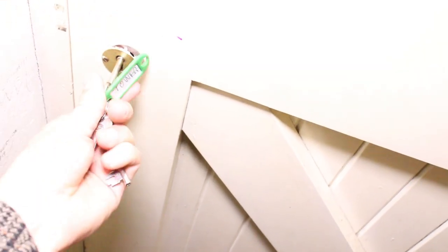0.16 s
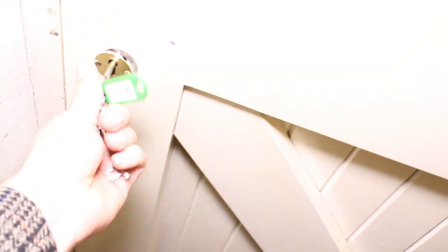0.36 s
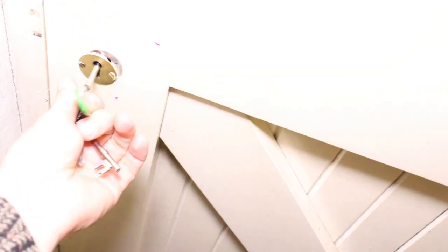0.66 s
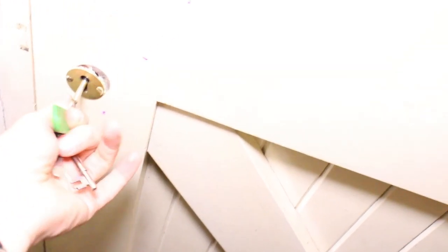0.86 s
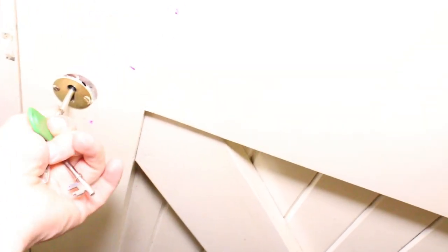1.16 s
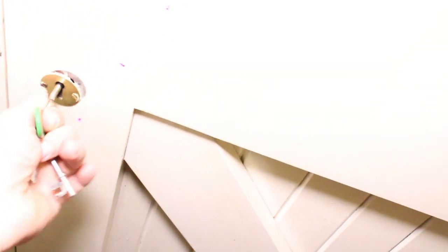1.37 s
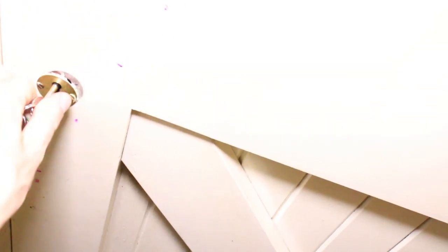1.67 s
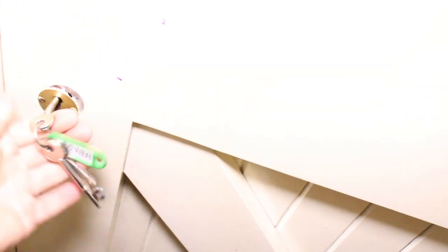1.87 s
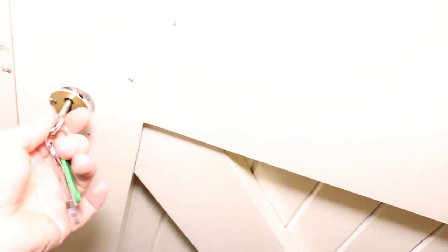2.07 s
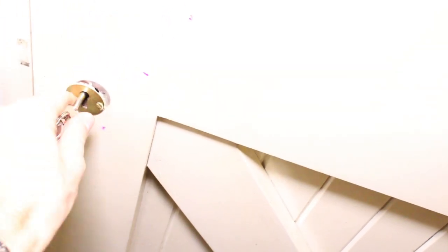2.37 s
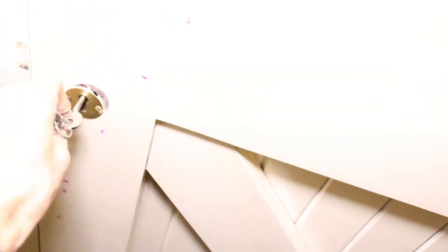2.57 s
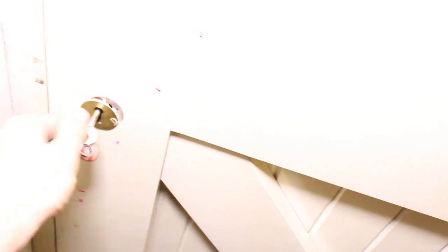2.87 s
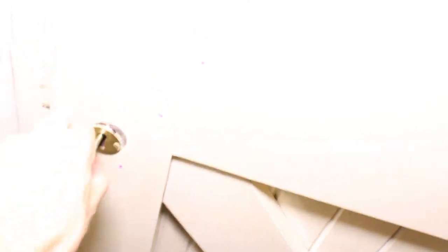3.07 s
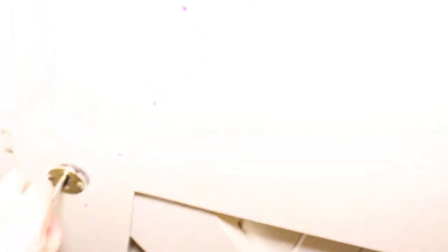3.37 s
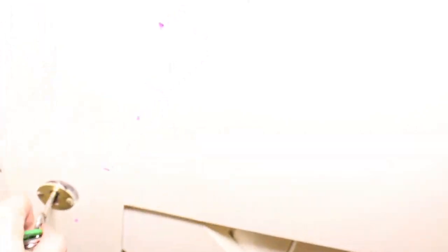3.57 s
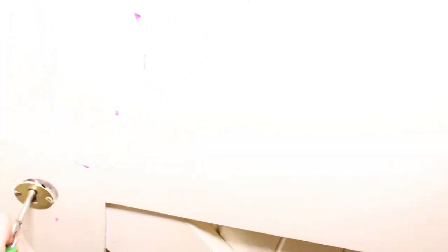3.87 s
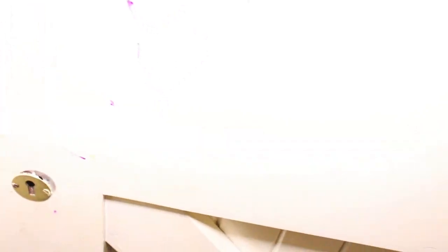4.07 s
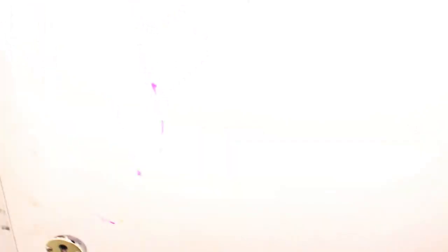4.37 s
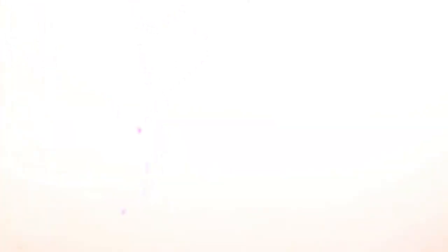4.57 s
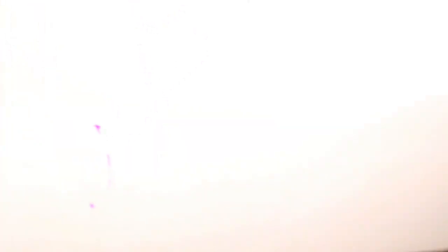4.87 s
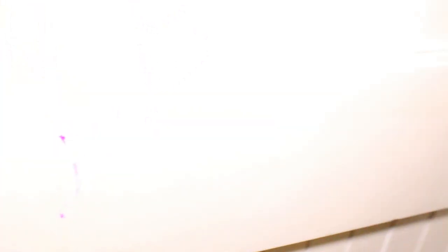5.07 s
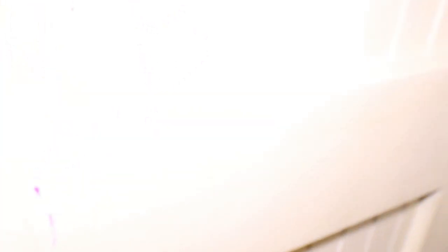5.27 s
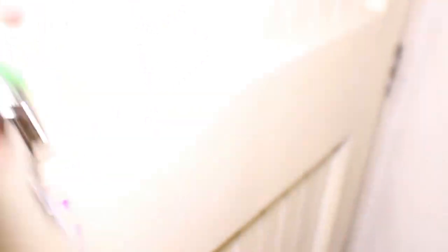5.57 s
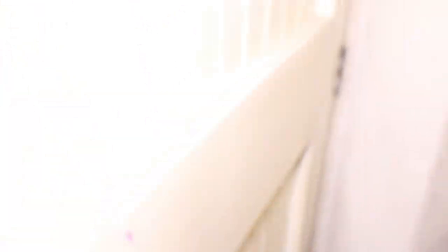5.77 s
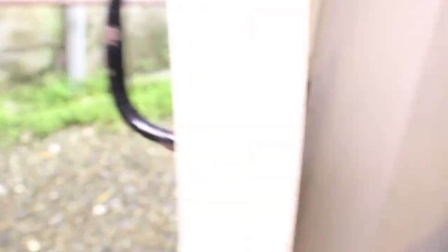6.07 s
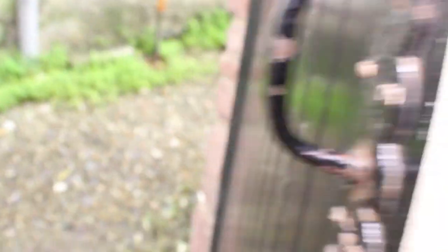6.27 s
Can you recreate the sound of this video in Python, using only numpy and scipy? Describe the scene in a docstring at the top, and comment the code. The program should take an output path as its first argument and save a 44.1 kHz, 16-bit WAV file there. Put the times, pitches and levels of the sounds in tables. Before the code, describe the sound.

Keys jangle and a lock clicks close by, a wooden door thudding in its frame before the steel latch clanks loudly.

```python
"""Keys work the lock of a wooden door, close to a small microphone in a bare hallway.
Over hush, rumble and a brief hum, keys chink and levers click. From 0.46 s the door thuds in its frame;
thin squeaks, handling bumps and the rasp of sliding metal follow. The steel latch rings faintly at 2.6 s
and clanks loudest near 4.8 s. From 5.4 s the door swings with a faint hiss."""
import sys
import numpy as np
from scipy import signal
from scipy.fft import rfft, irfft
from scipy.io import wavfile
from scipy.ndimage import uniform_filter1d

SR = 44100
rng = np.random.default_rng(int(sys.argv[2]) if len(sys.argv) > 2 else 0)


def to_wav(s):
    """Save 16-bit WAV."""
    ch = np.atleast_2d(s).T  # columns
    pcm = np.round(np.clip(ch, -1, 1) * 32767)  # PCM
    wavfile.write(sys.argv[1], SR, pcm.astype(np.int16))


N = 283563


def undb(db):
    return 10 ** (np.asarray(db) / 20)


def unit_rms(x):
    return x / np.sqrt(np.mean(x ** 2))


def coloured(spectrum):
    """Noise of rms 1 shaped by (Hz, dB) points."""
    hz, db = np.transpose(spectrum)
    bin_hz = np.maximum(np.fft.rfftfreq(N, 1 / SR), 1)
    gain = undb(np.interp(np.log(bin_hz), np.log(hz), db))
    return unit_rms(irfft(rfft(rng.standard_normal(N)) * gain, N))


def band(lo_hz, hi_hz):
    """Band noise of rms 1."""
    sos = signal.butter(3, [lo_hz, hi_hz], "bandpass", fs=SR, output="sos")
    return unit_rms(signal.sosfilt(sos, rng.standard_normal(N)))


def level_curve(points):
    """Linear gain along (s, .., dB) points; soft ends, silent outside."""
    points = np.array(points)
    db = np.interp(np.arange(N) / SR, points[:, 0], points[:, -1], left=-200, right=-200)
    return uniform_filter1d(undb(db), size=400)


def grit(per_s, spread_db, smear_s):
    """Envelope of rms 1: tiny impacts of uneven size."""
    size_db = spread_db * np.minimum(rng.exponential(size=N), 2)
    hits = undb(size_db) * (rng.random(N) < per_s / SR)
    return unit_rms(signal.lfilter([1], [1, -np.exp(-1 / (smear_s * SR))], hits))


def bursts(start_s, db, t60_s, rise_share):
    """Envelope: each burst swells over a share of its length, then decays."""
    env = np.zeros(N)
    for start, gain, length_s in zip((start_s * SR).astype(int), undb(db), np.clip(t60_s, .004, .6)):
        age = np.arange(min(int(length_s * SR), N - start)) / SR / length_s
        attack = (1 - np.exp(-age / rise_share)) ** 2
        env[start:start + len(age)] += gain * attack * np.exp(-np.log(1000) * age)
    return env


def ring(parts, blows, scatter_db, detune, rise_s, slow_share, flutter):
    """Blows (s, dB per part) excite modes with a fast and a slow decay; loose contact adds flutter."""
    hz, mode_db, t60_s = np.concatenate(parts).T[:, :, None]
    part_of_mode = np.repeat(np.arange(len(parts)), [len(p) for p in parts])
    out = np.zeros(N)
    for start_s, *part_db in blows:
        level_draw, pitch_draw, phase = rng.standard_normal((3, len(hz), 1))
        gain = undb(np.array(part_db)[part_of_mode, None] + mode_db + scatter_db * level_draw)
        start = int(start_s * SR)
        t = np.arange(min(int(t60_s.max() * SR), N - start)) / SR
        decay = np.exp(-np.log(1000) * t / t60_s)
        env = (1 - np.exp(-t / rise_s)) ** 2 * (slow_share * decay + (1 - slow_share) * decay ** 4)
        wave = np.sin(2 * np.pi * hz * t * (1 + detune * pitch_draw) + phase)
        out[start:start + len(t)] += (gain * env * wave).sum(axis=0)
    return out * (1 + flutter * band(hz.mean() / 300, hz.mean() / 50))


def hush(level_db=-80):
    """Steady noise floor, strongest near 130 Hz."""
    # Noise spectrum. Each row: frequency in Hz, relative density in dB.
    spectrum = [(76, -25.5), (130, 0), (282, -27), (437, -21), (588, -24.5), (825, -31), (1590, -35.5),
                (9310, -46), (15000, -59.5)]
    return undb(level_db) * coloured(spectrum)


def rumble():
    """Low noise that swells and sinks."""
    # Rumble spectrum. Each row: frequency in Hz, relative density in dB.
    spectrum = [(12, -47), (20, -13), (38, -1), (97, -8.5), (124, -14), (155, -19), (184, -28),
                (250, -31.5), (320, -53), (550, -120)]
    # Swells. Each row: time in seconds, level in dB.
    levels = [(0.0, -66.5), (1.14, -65), (1.31, -49.5), (2.2, -74), (3.81, -61.5), (5.64, -71),
              (5.87, -56.5), (6.43, -69)]
    return coloured(spectrum) * level_curve(levels)


def hum(hz=96):
    """Low tone, ending at the first door thud."""
    # Hum envelope. Each row: time in seconds, level in dB.
    levels = [(0.0, -58), (0.376, -68), (0.46, -59)]
    return np.sqrt(2) * level_curve(levels) * np.sin(2 * np.pi * hz * np.arange(N) / SR)


def keys(neighbour_db=-9.5, top_key_db=12):
    """Thin keys strike each other and ring high; a loose rattle in the hand stirs the same modes."""
    # Modes, one list per key. Each row: frequency in Hz, level in dB, t60 in seconds.
    modes = [
        [(7740, -4, 0.14), (8480, -3.5, 0.14), (8800, -7.5, 0.069)],
        [(9290, -6.5, 0.27), (9350, -8, 0.15), (10170, -12, 0.16)],
        [(13900, -4.5, 0.2)],
        [(15810, -13, 0.36), (15100, -13, 0.18)],
    ]
    # Key on key. Each row: start in seconds, level in dB, place from 0 (lowest key) to 3 (highest).
    chinks = [(.0727, -59, 0.11), (.0857, -53.5, 1.35), (.2004, -52, 0.16), (.3571, -48.5, 0.58),
              (.5876, -68, 0.048), (.7522, -61, 0.086), (1.6851, -52, 1.06), (1.7214, -53, 1.5),
              (1.8143, -38.5, 1.3), (1.9174, -55, 1.1), (1.9644, -57, 1.1), (2.0018, -49, 1.5),
              (2.0443, -56.5, 0.9), (2.0744, -60, .6), (2.1535, -41.5, 1), (2.238, -50, 0.11),
              (2.2732, -56.5, 1.1), (2.7714, -45, 0.82), (2.7894, -56, .9), (2.82, -44, 0.97),
              (3.5814, -71, .1), (3.6701, -57, .1), (4.0494, -62, 2.4), (4.2268, -63, 2.9),
              (4.3051, -51.5, 1.1), (4.3186, -53, 0.99), (4.4179, -57.5, 2)]
    # Rattling, one list per spell. Each row: time in seconds, level in dB.
    jangles = [
        [(0.0, -67), (0.032, -74), (0.35, -113)],
        [(1.65, -79), (1.988, -65.5), (2.4, -101)],
        [(2.72, -108), (2.776, -62), (2.9, -101)],
        [(4.28, -75.5), (4.36, -78.5), (4.46, -77)],
    ]
    ticks = band(4350, 15600) * grit(per_s=96, spread_db=3.1, smear_s=0.0075)
    shimmer = sum(undb(db) * unit_rms(signal.lfilter(*signal.iirpeak(hz, Q=90, fs=SR), ticks))
                  for hz, db, _ in np.concatenate(modes))
    rattle = unit_rms(ticks + 0.75 * shimmer) * sum(level_curve(spell) for spell in jangles)
    start_s, chink_db, place = np.transpose(chinks)
    key = np.arange(len(modes))[:, None]
    # Weaker with each key away from the blow; the highest answers more readily.
    key_db = chink_db + neighbour_db * np.abs(key - place) + top_key_db * (key == key.max())
    return rattle + ring(modes, np.column_stack([start_s, *key_db]),
                         scatter_db=3.8, detune=0.001, rise_s=0.00098, slow_share=0.048, flutter=0.7)


def lock(contact_db=-6.5, edge_db=-2.5, glint_db=-6, wood_db=-3, falloff_db_per_octave=-26):
    """Gritty lever contacts sound the wood and ring the case modes near each click's pitch."""
    # Clicks. Each row: start in seconds, level in dB, offsets in dB for wood, brightness and case ring,
    # favoured pitch in Hz, contact t60 in seconds.
    clicks = [(0.02, -42.5, -14, -17, -2.5, 3040, 0.036), (0.16, -44, -5.5, -13, -4, 1810, 0.042),
              (0.197, -51.5, -19, -2.5, -1, 4270, 0.028), (0.2265, -59, 0, -10, 3, 1270, 0.018),
              (0.3566, -45.5, -17, -1, -3, 2660, 0.043), (0.407, -47.5, -2, -33, 10.5, 1770, 0.042),
              (0.5124, -88, 21, -15, -4, 1220, 0.025), (0.5904, -73.5, -11, 12, 1, 4850, 0.047),
              (0.5965, -57.5, -20, -20, -4, 1910, 0.024), (0.6956, -65, -5, -17, -15, 1240, 0.029),
              (0.754, -80, -18, -3, 5, 4740, 0.027), (0.9835, -74.5, -5, -6.5, 3, 1550, 0.045),
              (1.1436, -55.5, -2, -13.5, 4, 1350, 0.03), (1.2294, -80, -9, 2, -11, 1290, 0.029),
              (1.3075, -37.5, -19, -8.5, -8, 1810, 0.042), (1.3466, -33.5, -3.5, -19, 1, 1840, 0.022),
              (1.6584, -49, -26, -36, 3, 1950, 0.03), (1.72, -58, 1.5, -6.5, 3, 2900, 0.092),
              (1.7786, -33, -8.5, -7, -1.5, 2990, 0.032), (1.8164, -61, -2, -1, -13, 3000, 0.031),
              (1.9154, -52, -18, -3, -2, 2480, 0.062), (1.9615, -57.5, -8, 2, -1.5, 4560, 0.02),
              (2.0426, -58, -9, 6, -4, 4220, 0.031), (2.1128, -54, -11, 3, 7, 4300, 0.032),
              (2.153, -50, -6.5, -1, -2, 2380, 0.038), (2.2129, -59.5, -8, -1, 9.5, 4820, 0.059),
              (2.2705, -51, -10.5, 0, 3, 1790, 0.026), (2.361, -63, -7, -17, -10, 2950, 0.023),
              (2.5126, -49, -22, -9.5, 1.5, 3250, 0.036), (2.5271, -38, -15, -8, 6, 2010, 0.033),
              (2.5868, -37.5, -7, -27, -7, 1990, 0.048), (2.6186, -37.5, -20, -12.5, -5.5, 2350, 0.042),
              (2.66, -48, -24, -17, -8, 2450, 0.04), (2.903, -38.5, -13.5, -6.5, -12, 4550, 0.048),
              (2.954, -50, -15, -7, -4, 2460, 0.035), (3.074, -54, -14.5, -13, -4, 2560, 0.052),
              (3.1724, -37.5, -10, -6, -2, 4500, 0.045), (3.2014, -43, -7, -7.5, -2, 1400, 0.037),
              (3.2692, -23, -7.5, -10, -3, 3080, 0.038), (3.4965, -58, -13.5, -12, -5, 3030, 0.033),
              (3.6547, -63.5, 1, -7.5, 1.5, 4160, 0.031), (3.671, -55.5, -3.5, -11, -4.5, 2880, 0.044),
              (3.6815, -55, 0, -16, -6, 2250, 0.025), (3.8544, -65, 1.5, -13, -22.5, 2230, 0.051),
              (3.87, -55.5, -10, -13, -4, 1310, 0.07), (3.902, -47.5, -30, -1, -1, 4370, 0.028),
              (3.9548, -44.5, -5, -6, -7, 3100, 0.04), (3.9868, -41.5, -1.5, -8.5, -2, 1270, 0.085),
              (4.0165, -37, -8, -3.5, -5, 3200, 0.047), (4.0459, -43, -17, 4, -1.5, 3140, 0.018),
              (4.5768, -27, -17, -0.5, -3.5, 2270, 0.037), (4.6598, -36, -11, -14, -19, 1750, 0.024),
              (4.7335, -47, -8, 1, -8, 2300, 0.074), (4.783, -25.5, -8, -2, -8, 3640, 0.066),
              (4.837, -22.5, -11, -5.5, -6, 2220, 0.057), (5.233, -50, -14, -31, -2.5, 3240, 0.026),
              (5.3368, -37.5, -5, -7, 4, 1590, 0.053), (5.8042, -63, -7.5, -18, -4.5, 2286, 0.046),
              (5.891, -71, -5, -21.5, -5, 2220, 0.036), (5.9198, -68.5, -8.5, -22, 4, 2246, 0.035)]
    # Case modes, low to high groups. Each row: frequency in Hz, level in dB, t60 in seconds.
    case_modes = [
        [(1387, -11.5, 0.092), (1957, -8.5, 0.05), (2300, -4, .1)],
        [(2880, -6, 0.2), (3130, -5, 0.18), (2950, -5, .08), (3450, -7.5, 0.059)],
        [(4360, -6, 0.12), (4720, -2.5, 0.07), (5140, -4.5, 0.063)],
    ]
    start_s, db, wood_offset_db, bright_db, ring_db, pitch_hz, t60_s = np.transpose(clicks)
    chatter = 1.3 + 0.9 * grit(per_s=600, spread_db=4, smear_s=0.002)
    contact = band(1500, 4300) * bursts(start_s, db + contact_db, t60_s, 0.089)
    edge = band(5000, 10000) * bursts(start_s, db + bright_db + edge_db, 0.73 * t60_s, 0.074)
    glint = band(9500, 14900) * bursts(start_s, db + 1.32 * bright_db + glint_db, 0.76 * t60_s, 0.04)
    wood = band(300, 1500) * bursts(start_s, db + wood_offset_db + wood_db, 2.8 * t60_s, 0.036)
    modes = np.concatenate(case_modes)[:, None]  # one part per mode
    octaves_off = np.abs(np.log2(modes[:, :, 0] / pitch_hz))
    mode_db = db + ring_db + falloff_db_per_octave * octaves_off
    case = ring(modes, np.column_stack([start_s, *mode_db]),
                scatter_db=3.4, detune=0.02, rise_s=0.00071, slow_share=0.0804, flutter=1.0)
    return chatter * (contact + edge + glint) + wood + case


def door_thuds():
    """The leaf booms at its lowest modes; panels and frame rattle. Harder blows: more knock, less boom."""
    # Door on frame. Each row: start in seconds, level in dB, hardness in dB, knock t60 in seconds.
    thuds = [(0.462, -37.5, 1.5, 0.12), (.488, -43.5, -8, 0.074), (1.062, -43, -4, 0.098),
             (1.195, -54.5, -12.5, 0.23), (1.397, -36, 4, 0.071), (1.439, -40, -1, 0.075),
             (1.74, -49, 4.5, 0.14), (2.54, -50, 7.5, 0.25), (2.56, -57.5, -2.5, 0.52),
             (2.616, -54.5, 10.5, 0.11), (2.895, -64.5, 11, 0.25), (3.26, -44.5, 4.5, 0.16),
             (3.328, -58.5, -9.5, .046), (3.695, -49.5, -9.5, 0.049), (4, -46, 1.5, 0.047),
             (4.566, -47.5, 7.5, 0.068), (4.816, -46, 11, 0.21), (5.087, -58.5, 6, 0.11),
             (5.168, -62, 11.5, 0.059), (5.332, -57.5, 10.5, 0.092), (5.722, -45.5, -5, 0.15)]
    # Leaf modes, grouped as boom, panel, knock. Each row: frequency in Hz, level in dB, t60 in seconds.
    modes = [
        [(34.22, -4.5, 1), (53.48, -2, 0.81), (91, -3.5, 0.6)],
        [(147.5, -9.5, 0.53), (226, -9, 0.3)],
        [(392.7, -9, 0.19), (520.3, -8, 0.14)],
    ]
    start_s, panel_db, hard_db, t60_s = np.transpose(thuds)
    boom_db = panel_db - hard_db
    knock_db = panel_db + 1.39 * hard_db - 2
    panel = band(120, 450) * bursts(start_s, panel_db, 1.53 * t60_s, 0.017)
    knock = band(330, 900) * bursts(start_s, knock_db, t60_s, 0.13)
    leaf = ring(modes, np.column_stack([start_s, boom_db, panel_db, knock_db]),
                scatter_db=0.77, detune=0.0012, rise_s=0.0043, slow_share=0.74, flutter=0.4)
    return leaf + panel + knock


def squeaks():
    """Faint gliding whistles with a slight waver."""
    # Glides, one list per squeak. Each row: time in seconds, pitch in Hz, level in dB.
    glides = [
        [(0.64, 10600, -105), (0.696, 11160, -94), (0.74, 10500, -115)],
        [(4.43, 10840, -91.5), (4.518, 11150, -76), (4.56, 11400, -82)],
        [(5.55, 11300, -108), (5.618, 11360, -90.5), (5.9, 11930, -103)],
    ]
    # Higher tone over the second squeak. Each row: time in seconds, pitch in Hz, level in dB.
    upper_glide = [(4.432, 13308, -93), (4.54, 14084, -78.5), (4.56, 13923, -89)]
    out = np.zeros(N)
    for glide in [*glides, upper_glide]:
        time_s, hz, _ = np.transpose(glide)
        waver = 1 + 0.029 * uniform_filter1d(rng.standard_normal(N), 300)
        phase = 2 * np.pi * np.cumsum(np.interp(np.arange(N) / SR, time_s, hz) * waver) / SR
        flutter = 1 + 0.5 * band(14, 120)
        out += np.sqrt(2) * level_curve(glide) * flutter * np.sin(phase)
    return out


def handling_bumps(cycles=2.4):
    """Soft bumps on the microphone, each a short low pulse."""
    # Bumps. Each row: start in seconds, level in dB, pitch in Hz.
    bumps = [(0.943, -53, 91), (2.126, -53, 114), (2.398, -65, 71.6), (2.956, -56, 98), (3.158, -53.5, 128),
             (4.252, -45.5, 111), (4.515, -45, 114), (5.619, -62.5, 96), (6.137, -60, 150.2)]
    out = np.zeros(N)
    for start_s, db, hz in bumps:
        start = int(start_s * SR)
        phase = 2 * np.pi * hz * np.arange(int(cycles * SR / hz)) / SR
        out[start:start + len(phase)] += undb(db) * np.hanning(len(phase)) * np.sin(phase)
    return out


def metal_drag():
    """Uneven stick-slip grit as metal slides on metal."""
    # Sliding, one list per slide. Each row: time in seconds, level in dB.
    slides = [
        [(1.28, -88), (1.316, -55.5), (1.5, -102)],
        [(2.52, -77), (2.53, -51), (2.75, -72)],
        [(3.98, -67), (4.026, -71), (4.15, -117)],
        [(4.54, -82), (4.572, -53), (4.78, -57)],
    ]
    noise = coloured([(200, -7.5), (450, 3.5), (2000, -1.5), (5000, -14), (10000, -20), (16000, -31)])
    rasp = 0.6 + grit(per_s=400, spread_db=7, smear_s=0.003)
    return unit_rms(noise * rasp) * sum(level_curve(slide) for slide in slides)


def latch():
    """The struck steel bar rings in two close groups of modes."""
    # Bar modes, low and high group. Each row: frequency in Hz, level in dB, t60 in seconds.
    modes = [
        [(6860, -7.5, 0.46), (6950, -7, 0.12), (8600, -17.5, 0.11)],
        [(10500, -13.5, 0.14), (10820, -5, 0.2), (11300, -8, 0.082), (11400, -9, 0.1), (11260, -4, 0.36),
         (11600, -7.5, .12)],
    ]
    # Blows on the bar. Each row: start in seconds, low group level in dB, high group level in dB.
    clanks = [(2.6424, -61, -59), (3.0772, -56, -76), (4.5725, -34, -31), (4.7373, -52, -51.5),
              (4.784, -23, -19), (4.7999, -39, -38), (4.836, -23.5, -22)]
    return ring(modes, clanks, scatter_db=1.5, detune=0.0006, rise_s=0.0009, slow_share=0.14, flutter=0.45)


def door_swing():
    """Faint hiss from the turning hinge."""
    # Hiss envelope. Each row: time in seconds, level in dB.
    levels = [(5.42, -102.5), (5.6, -90.5), (5.95, -92), (6.05, -100)]
    return band(1600, 11800) * level_curve(levels)


def hallway(direct, tail_db=-6.5, build_s=0.0073):
    """Direct sound plus a diffuse tail off walls a few metres away; the treble dies first."""
    # Hallway decay. Each row: frequency in Hz, t60 in seconds.
    decay_times = [(150, 0.57), (500, 0.33), (1500, 0.36), (4000, 0.39), (9000, 0.27), (14000, 0.29)]
    hall_hz, hall_t60_s = np.transpose(decay_times)
    t = np.arange(int(0.75 * SR)) / SR
    tail = np.zeros(len(t))
    for hz in 60 * 2 ** np.arange(0, 8.1, .5):  # half-octave bands
        t60_s = np.interp(np.log(hz), np.log(hall_hz), hall_t60_s)
        sos = signal.butter(3, [hz / 2 ** .25, hz * 2 ** .25], "bandpass", fs=SR, output="sos")
        tail += signal.sosfilt(sos, rng.standard_normal(len(t))) * np.exp(-np.log(1000) * t / t60_s)
    tail *= 1 - np.exp(-(t / build_s) ** 2)
    tail /= np.sqrt(np.sum(tail ** 2))
    return direct + undb(tail_db) * signal.fftconvolve(direct, tail)[:N]


def scene():
    """Mono mix; only the keys, lock and door sounds pass through the hallway."""
    near = lock() + keys() + latch() + door_thuds() + door_swing() + metal_drag() + squeaks()
    lows = hum() + rumble() + handling_bumps()
    return (hallway(near) + lows + hush())[None]


def record(dry):
    """The recorder cuts above 16 kHz."""
    return signal.sosfilt(signal.ellip(10, .2, 70, 16000, fs=SR, output="sos"), dry)


dry = scene()
out = record(dry)
to_wav(out)
```